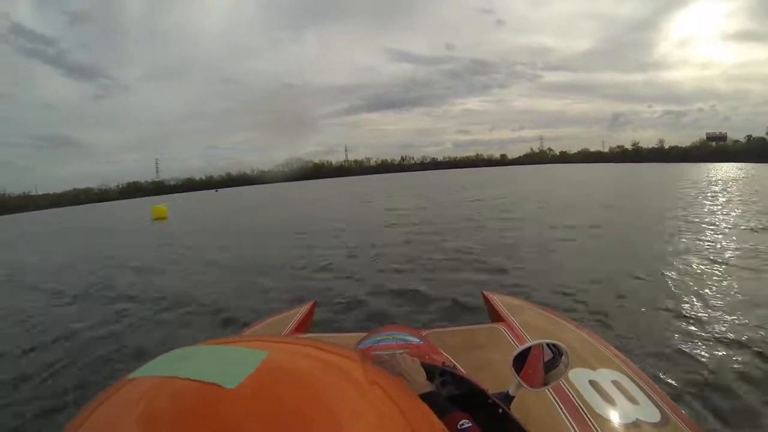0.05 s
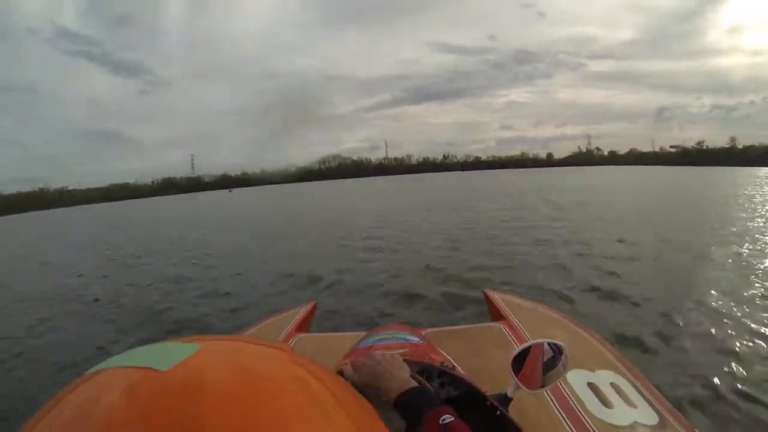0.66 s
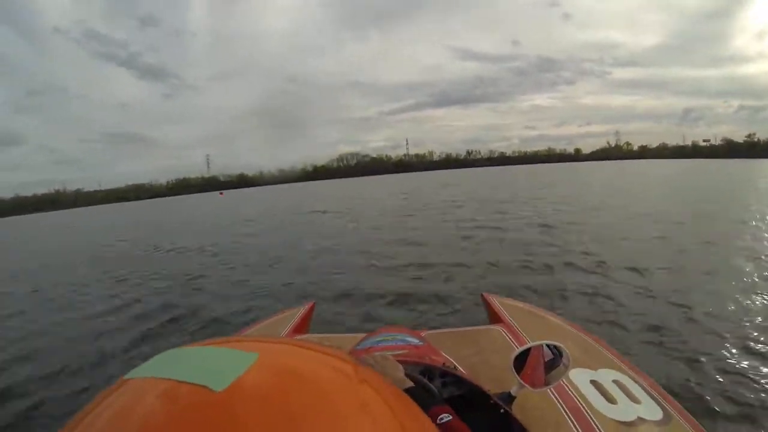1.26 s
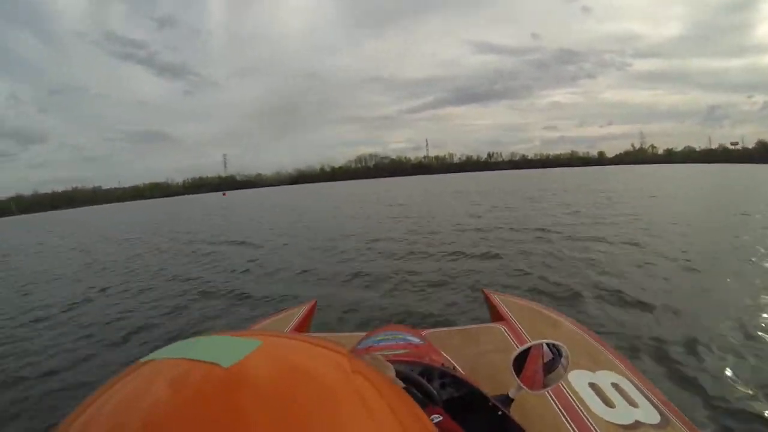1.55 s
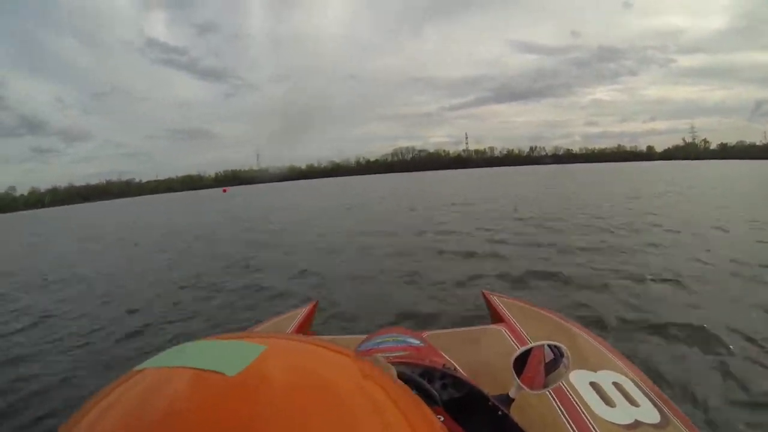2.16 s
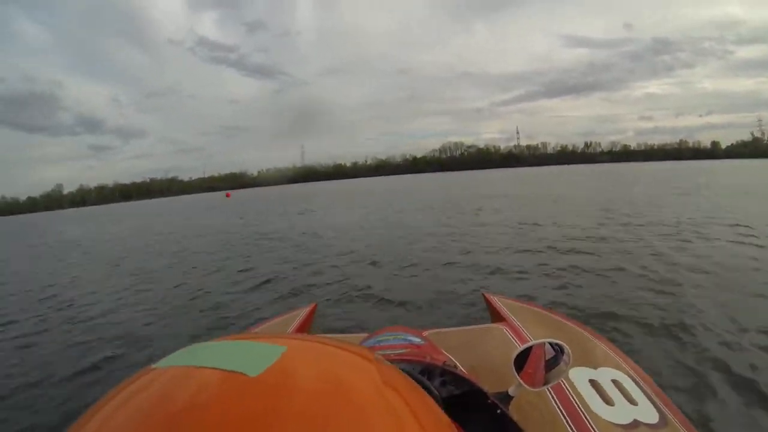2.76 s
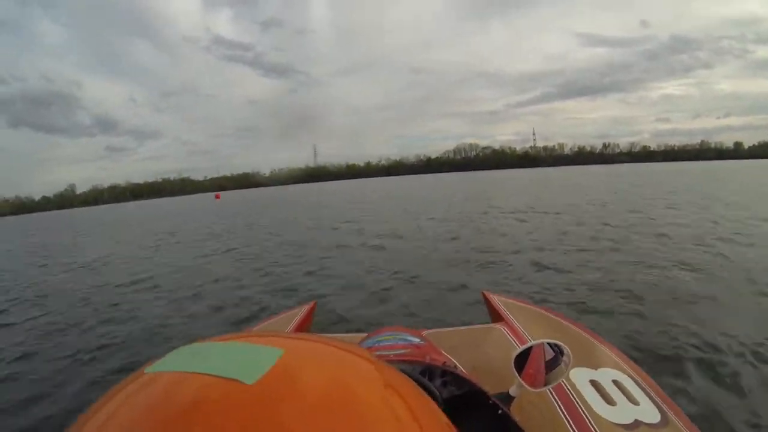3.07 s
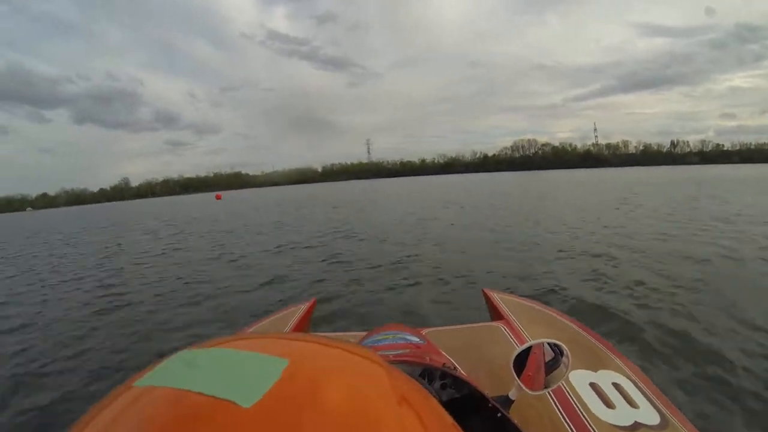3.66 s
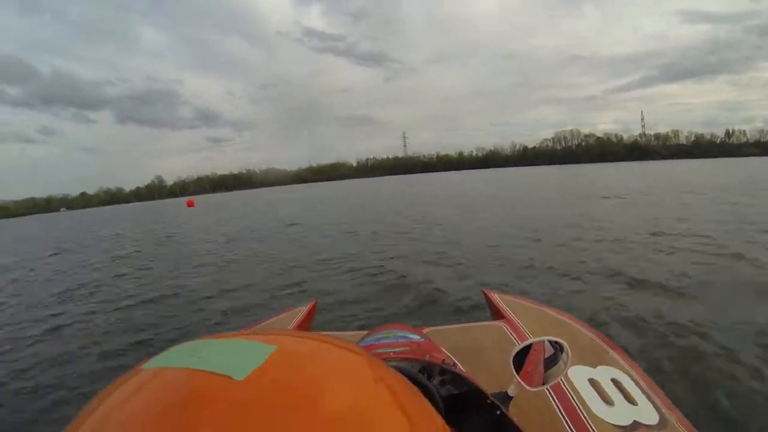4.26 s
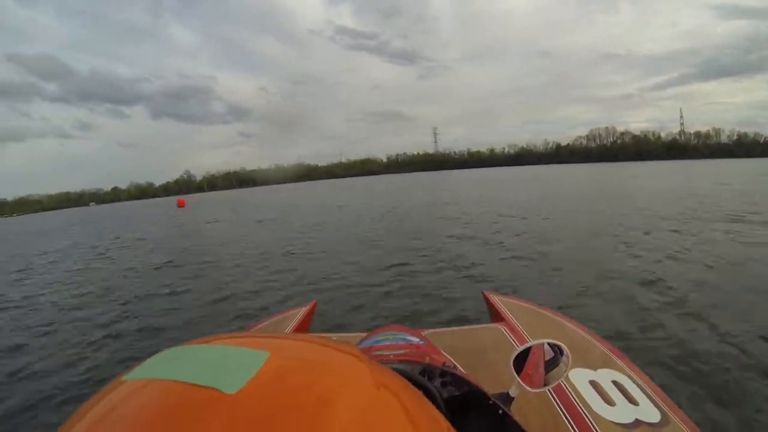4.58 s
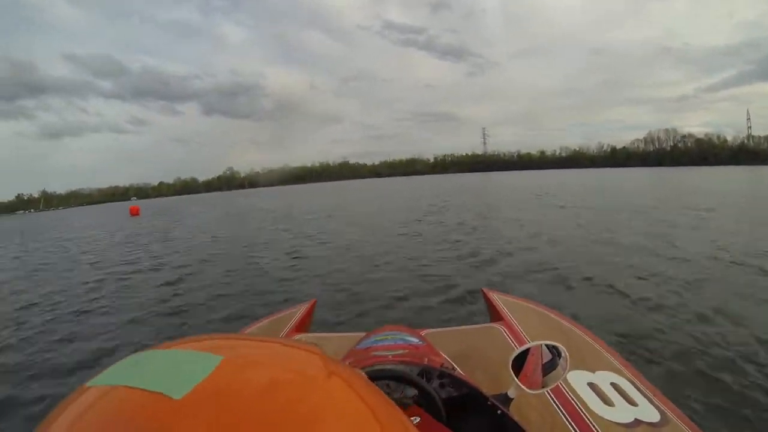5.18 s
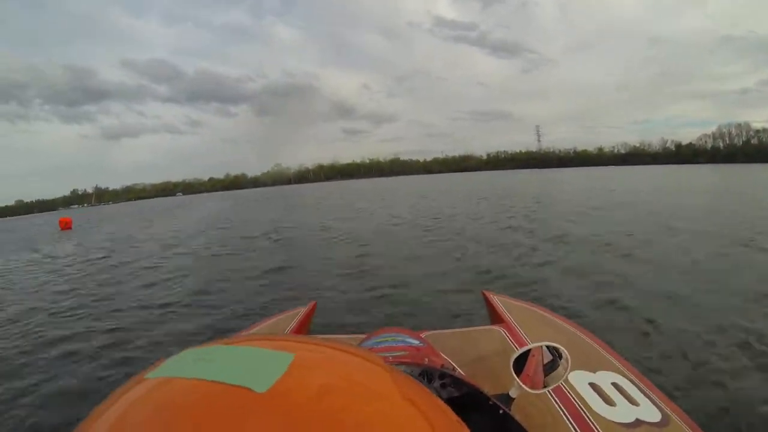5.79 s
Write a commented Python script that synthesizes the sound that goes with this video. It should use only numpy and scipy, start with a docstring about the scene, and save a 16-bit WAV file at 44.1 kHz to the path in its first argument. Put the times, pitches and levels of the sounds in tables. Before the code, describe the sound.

Heard from the deck of a speeding racing boat, a deep engine drone and raspy buzz mix with thumping wind on a slightly distorted, dull microphone. Early on the engine sags in pitch for half a second, then picks up and holds steady. Water rushes along the hull, with hollow knocks, short splashes and light spray ticks becoming more frequent in the second half.

```python
"""Racing boat on a lake

On deck, flat out, heard close up through a camera's built-in microphone. A low drone wavers, at moments
dropping to its lower note; the engine rasps in the housing and eases briefly after a second. Wind buffets
the case, the hull slaps through growing chop, spray ticks, and the bass overloads the microphone."""
import sys
import numpy as np
from scipy import signal
from scipy.fft import rfft, irfft, next_fast_len
from scipy.io import wavfile
from scipy.ndimage import map_coordinates

SR = 44100
rng = np.random.default_rng(int(sys.argv[2]) if len(sys.argv) > 2 else 0)


def to_wav(sig):
    """Store sig (one row per channel, or 1-D mono) as 16-bit WAV at the path in sys.argv[1].

    Samples outside -1..1 are clipped; the rate is SR.
    """
    pcm = np.clip(np.atleast_2d(sig), -1, 1) * 32767
    pcm = np.round(pcm).astype(np.int16)
    wavfile.write(sys.argv[1], SR, pcm.T)  # frames by channels


N = 261513
TIME = np.arange(N) / SR

# pitch shared by engine and low drone, with the drone's mid-run waver: (time [s], cycle rate [Hz])
SHARED_PITCH = [(0, 31.05), (.22, 30.93), (.45, 31.38), (.73, 31.92), (.9, 31.65), (1.0, 30.1),
                (1.13, 29.05), (1.3, 29.05), (1.5, 29.6), (1.65, 30.6), (1.9, 31.6), (2.3, 31),
                (2.65, 32.8), (2.93, 31.2), (3.1, 32.6), (3.4, 31.4), (4.3, 31.9), (5.35, 31.2),
                (5.93, 31.8)]
def pitch_cycles():
    """Cycles of the shared pitch so far; an order is a multiple of their rate."""
    return np.cumsum(curves(SHARED_PITCH)[0]) / SR


# each cylinder's strength, in firing order: (level [dB])
CYLINDERS = [5.5, -7, 0, 2.5, 0, -7]
def firings(cycles):
    """Each firing starts sharply and dies away, in the uneven pattern of the cylinders."""
    fired = cycles * len(CYLINDERS)
    index = fired.astype(int)
    strength_db = np.take(CYLINDERS, index % len(CYLINDERS)) + .5 * rng.standard_normal(N)[index]
    return amp(strength_db) * np.exp(-(fired % 1) / .35)  # decays over .35 of the gap to the next


# the drone drops to its lower note: (time [s], width [s], depth [0-1])
NOTE_DIPS = [(0.195, 0.038, 0.68), (0.561, 0.13, 0.5), (1.616, 0.081, 0.72), (2.09, 0.11, 0.77),
             (2.317, 0.033, 0.9), (2.595, 0.039, 0.86), (3.132, 0.019, 0.66), (3.412, 0.073, 0.98),
             (4.489, 0.027, .7), (4.724, 0.045, 0.5), (5.16, 0.048, 0.92), (5.698, 0.09, 0.85)]
# clean tone at the firing rate, booming while the engine is slowed: (time [s], level [dB])
FIRING_TONE = [(0, -25.5), (.5, -29.5), (.9, -21.5), (1.12, -17), (1.28, -18.5), (1.37, -11.5),
               (1.45, -17.5), (1.53, -18.5), (1.63, -24), (2, -30), (3.55, -26.5), (3.72, -22.5),
               (4.0, -25), (5.03, -24.5), (5.14, -18), (5.26, -25), (5.38, -20.5), (5.93, -24.5)]
# the drone's weaker upper tones: (order [x cycle rate], level [dB])
UPPER_ORDERS = [(4, -21), (5, -21)]
def drone(cycles):
    """A low wavering drone, with a clean firing tone above it; at moments it drops to its lower note."""
    def tone(order, waver_db, drift_rad):
        phase = 2 * np.pi * (order * cycles + rng.random())
        phase = phase + drift_rad * wobble(22) + .65 * wobble(8)
        return unit(amp(waver_db * wobble(25)) * np.sin(phase))

    dip = sum(depth * bell(s, width) for s, width, depth in NOTE_DIPS)
    lower = amp(-18.5 + 12.5 * dip) * tone(2, waver_db=2.5, drift_rad=.55)
    main = amp(-10.5 + .23 * TIME - 6.5 * dip) * tone(3, waver_db=2.5, drift_rad=.49)
    firing_db = curves(FIRING_TONE)[0] + wobble(20)
    firing = amp(firing_db) * unit(np.sin(2 * np.pi * len(CYLINDERS) * cycles + .21 * wobble(20)))
    upper = sum(amp(db) * tone(round(k), waver_db=1.5, drift_rad=.89) for k, db in UPPER_ORDERS)
    return lower + main + firing + upper


# spectrum of the firings' rasp: (frequency [Hz], level [dB])
RASP_SPECTRUM = [(150, -16), (400, -4.5), (700, 2.5), (1600, 2.5), (2400, -7), (2750, -12), (3400, -5),
                 (3800, -7), (4400, -18.5), (9000, -39), (13000, -63)]
def rasp(cycles, steady_jet=.2):
    """Each firing is a puff of turbulent gas on a steady jet, growing louder along the run."""
    puffs = (steady_jet + firings(cycles)) * rng.standard_normal(N)
    return amp(-39.5 + 1.12 * TIME - 2 * eased()) * unit(housing(coloured(puffs, RASP_SPECTRUM)))


def buzz(cycles, steady_share=.3):
    """The pipe's echoes follow each firing with a dense, repeating wave that rings the housing."""
    size = 2048
    orders = np.arange(size // 2 + 1)
    passband = (orders > 14) / (1 + (orders / 112) ** 24)
    emphasis_db = 1.5 * np.log2(orders + 1) - (orders % 2 == 0)  # high and odd orders stand out
    phases = np.exp(2j * np.pi * rng.random(len(orders)))
    one_cycle = irfft(passband * amp(emphasis_db) * phases)
    echoes = np.interp(cycles % 1, np.arange(size) / size, one_cycle, period=1)
    pulsed = echoes * (steady_share + firings(cycles))
    return amp(-37.5 - .5 * TIME + .5 * eased()) * unit(housing(pulsed))


# high engine orders that sing: (order [x cycle rate])
SINGING_ORDERS = [30, 37, 52, 59, 80, 106]
# the balance of those orders: (level [dB])
SINGING_LEVELS = [-13, -11, -6, -11, -16, -18]
def singing(cycles, steady_share=.3):
    """A few high orders sing with a rough, metallic edge, fading as the run goes on."""
    shaken = cycles + .0011 * wobble(110)  # uneven firing shakes their timing
    tones = sum(amp(db + .5 * wobble(5.7)) * unit(np.sin(2 * np.pi * (round(k) * shaken + rng.random())))
                for k, db in zip(SINGING_ORDERS, SINGING_LEVELS))
    return amp(-33.5 - 9 * TIME + .5 * eased()) * unit(steady_share + firings(cycles)) * tones


def case_ring(cycles, order=22):
    """One fading order swells whenever its pitch lands on the housing's lowest resonance."""
    level_db = -44.5 - 3 * TIME + 2 * wobble(13)
    return amp(level_db) * unit(housing(np.sin(2 * np.pi * order * cycles)))


# surges of the engine's snarl: (time [s], width [s], gain [dB])
SNARLS = [(0.392, 0.009, 4), (0.903, 0.032, 4.5), (1.606, 0.023, 2.5), (1.76, 0.07, 0), (2.071, 0.029, 3),
          (3.037, 0.019, 3), (3.224, 0.012, 1)]
def snarls():
    """The engine's upper sound surges for an instant; the gain is in dB."""
    return sum(db * bell(s, width) for s, width, db in SNARLS)


def eased(start_s=.97, end_s=1.56, ramp_s=.077):
    """1 while the throttle is eased, 0 at full throttle."""
    return np.clip(.5 + np.minimum(TIME - start_s, end_s - TIME) / ramp_s, 0, 1)


# spectrum of the wind right at the microphone: (frequency [Hz], level [dB])
WIND_SPECTRUM = [(10, -16), (25, -2), (45, -3), (65, 2), (80, 4), (100, 1.5), (125, 1), (170, -7),
                 (225, -19.5), (320, -24.5), (450, -30.5), (700, -44.5), (1500, -65.5)]
def wind():
    """Turbulent air thumps on the housing in quick lumps."""
    level_db = -12.5 - 1.5 * eased() + 1.7 * wobble(14)
    return amp(level_db) * unit(coloured(rng.standard_normal(N), WIND_SPECTRUM))


# rush on the hull as the lake gets choppier: (time [s], level [dB])
CHOP = [(0, -31), (.55, -29), (.9, -27.5), (1.45, -26), (1.7, -25.5), (2.25, -28.5), (2.55, -25),
        (3.3, -26), (3.75, -27.5), (4.25, -25), (5.93, -25)]
# the hull slaps a ripple: (time [s], width [s], splash level [dB], hollow knock level [dB])
SLAPS = [(2.059, 0.016, -32, -29), (3.185, 0.039, -42.5, -27.5), (3.458, 0.021, -28.5, -21.5),
         (3.545, 0.0065, -25.5, -15), (3.639, 0.0072, -26, -17), (3.874, 0.01, -32, -15.5),
         (3.925, 0.016, -28, -19.5), (4.104, 0.0054, -22.5, -10), (4.141, 0.014, -29.5, -27),
         (4.296, .009, -22, -35), (4.364, .007, -25.5, -32), (4.793, .011, -27, -17.5),
         (4.957, 0.015, -19.5, -21.5), (5.022, 0.011, -27.5, -30), (5.358, 0.03, -37.5, -18.5),
         (5.453, 0.0078, -28, -21), (5.647, 0.0042, -21, -16), (5.897, 0.028, -24, -25)]
# spectrum of the water, heard from the deck: (frequency [Hz], level [dB])
WATER_SPECTRUM = [(150, -23.5), (400, -13.5), (570, -0.5), (680, 2.5), (800, -2.5), (1000, -7),
                  (1400, -5.5), (1700, -5.5), (2100, -16.5), (2500, -17.5), (2800, -21.5), (3650, -24.5),
                  (4400, -41), (6500, -42), (12000, -76)]
def water():
    """Water rattles along the hull; each slap splashes and jolts the housing's lowest resonance."""
    times, widths, splash_db, knock_db = np.transpose(SLAPS)
    chop_db = curves(CHOP)[0] - 5.5 * eased() + .3 * wobble(6.3)
    level = amp(chop_db) + swells(times, widths, splash_db)
    rattle = unit(amp(1.3 * wobble(350)) * rng.standard_normal(N))
    rush = coloured(level * rattle, WATER_SPECTRUM)
    knocks = swells(times, widths, knock_db) * np.sin(2 * np.pi * CASE_MODES[0][0] * TIME + wobble(70))
    return .77 * rush + .79 * housing(rush) + knocks


# showers of spray on the case: (time [s], width [s], level [dB])
SHOWERS = [(3.512, 0.034, -54.5), (3.707, .04, -56), (4.298, 0.0073, -54.5), (4.958, .014, -51.5),
           (5.575, 0.012, -56.5), (5.903, .018, -57)]
# large drops landing beside the microphone: (time [s], relative level [dB])
DROPS = [(1.536, -45), (2.4107, -34.5), (2.538, -41.5), (2.838, -36.5), (3.0262, -38), (3.3988, -36),
         (3.479, -37.5), (3.6944, -41.5), (3.948, -38), (4.6486, -29.5), (4.9356, -28.5), (5.217, -28),
         (5.249, -36.5)]
# spectrum of the ticks on the case: (frequency [Hz], level [dB])
SPRAY_SPECTRUM = [(1500, -6), (3500, 5), (5000, 2.5), (5700, -2), (6500, 2.5), (7400, -6.5), (10000, -10.5),
                  (12500, -19), (15000, -28.5)]
def spray():
    """Fine spray patters on the case, more in chop and at each slap, with showers and large drops."""
    def patter(per_second, spread_db):
        sizes = amp(-spread_db * rng.random(N)) * rng.choice([-1, 1], N)
        return unit((rng.random(N) < per_second / SR) * sizes)

    chop_db, = curves(CHOP)
    times, widths, splash_db, _ = np.transpose(SLAPS)
    fine = patter(per_second=54, spread_db=19) + amp(-16.5) * rng.standard_normal(N)  # over hissing mist
    ticks = amp(-69 + .9 * (chop_db - chop_db[0])) * fine
    thrown = swells(times, widths, splash_db - 37.5)
    ticks += (thrown + swells(*np.transpose(SHOWERS))) * patter(per_second=450, spread_db=31.5)
    age = TIME[:SR // 50]
    for s, db in DROPS:
        splash = rng.standard_normal(len(age)) * np.exp(-age / .0014)
        ticks[round(s * SR):][:len(age)] += amp(db - 9.5) * splash
    return coloured(ticks, SPRAY_SPECTRUM)


# resonances of the housing around the microphone: (frequency [Hz], bandwidth [Hz], level [dB])
CASE_MODES = [(682, 30, 0), (870, 80, -16), (1125, 60, -10.5), (1530, 70, -10.5), (1640, 90, -10),
              (1810, 100, -12), (2450, 130, -17), (3110, 130, -21), (3280, 80, -12)]
def housing(x):
    """The case rings at its own resonances."""
    return filtered(x, lambda f: sum(amp(db) * 1j * f * width / (hz * hz - f * f + 1j * f * width)
                                     for hz, width, db in CASE_MODES))


def microphone(air, ceiling=.5, knee=2.1, treble_hz=7200):
    """The microphone flattens at its limit, so bass swings chop the higher sound; its top is dull."""
    pressure = 1.55 * air + .05  # the slipstream's steady push makes it lopsided, adding even overtones
    flattened = pressure / (1 + np.abs(pressure / ceiling) ** knee) ** (1 / knee)
    return filtered(flattened - flattened.mean(), lambda f: 1 / (1 + (f / treble_hz) ** 6))


def amp(db):
    """Decibels to gain."""
    return 10 ** (np.asarray(db) / 20)


def unit(x):
    """Scale to rms 1."""
    return x / np.sqrt(np.mean(x ** 2) + 1e-20)


def curves(rows):
    """One value per sample for each column after the time."""
    times, *columns = np.transpose(rows)
    return [np.interp(TIME, times, column) for column in columns]


def wobble(rate):
    """A smooth random curve, rate knots a second."""
    return map_coordinates(rng.standard_normal(int(N * rate / SR) + 4), [TIME * rate])


def bell(s, width):
    """A smooth rise and fall of height 1 around a moment."""
    return np.exp(-.5 * ((TIME - s) / width) ** 2)


def swells(times, widths, levels_db):
    """Bell-shaped surges of gain."""
    return sum(amp(db) * bell(s, width) for s, width, db in zip(times, widths, levels_db))


def filtered(x, response):
    """Filter x by a complex response of frequency."""
    size = next_fast_len(N + SR // 2)
    return irfft(rfft(x, size) * response(np.fft.rfftfreq(size, 1 / SR)), size)[:N]


def coloured(x, points):
    """Causal filter of energy 1 shaped by (Hz, dB) points."""
    hz, db = np.transpose(points)
    size = 16384
    grid = np.fft.rfftfreq(size, 1 / SR)
    gain = amp(np.interp(np.log(grid + 1), np.log(hz), db))
    cepstrum = irfft(np.log(gain))
    cepstrum[1:size // 2] *= 2  # folded for minimum phase
    cepstrum[size // 2 + 1:] = 0
    kernel = irfft(np.exp(rfft(cepstrum)))
    return signal.fftconvolve(x, kernel / np.linalg.norm(kernel))[:N]


def scene():
    """Airborne sound overloads the microphone; vibration through the mount and spray ride on top."""
    cycles = pitch_cycles()
    snarl_db = snarls()
    engine = amp(snarl_db) * (buzz(cycles) + rasp(cycles) + singing(cycles))
    splashes = swells(*np.transpose(SLAPS)[:3])
    falter = amp(-.7 * snarl_db) / (1 + 4 * splashes)  # the bass dips under snarls and slaps
    hull = water()
    air = falter * (drone(cycles) + wind()) + .37 * engine + .52 * hull
    through_mount = .38 * engine + case_ring(cycles) + amp(-18) * hull
    return (microphone(air) + through_mount + spray())[None]


def record(dry):
    """The camera's bass cut tilts the flattened wave tops; nothing passes above its band limit."""
    cut_hz, top_hz = 44, 15800
    return filtered(dry[0], lambda f: 1j * f / (cut_hz + 1j * f) * (f < top_hz))[None]


dry = scene()
out = record(dry)
to_wav(out)
```